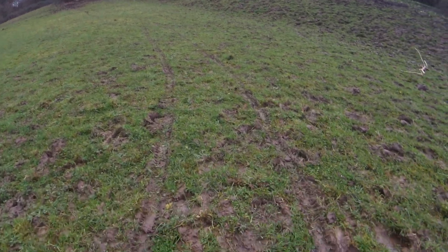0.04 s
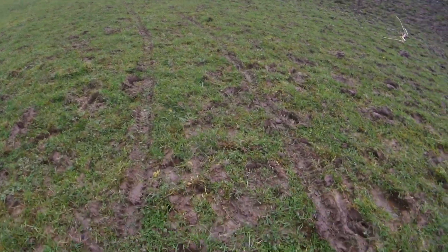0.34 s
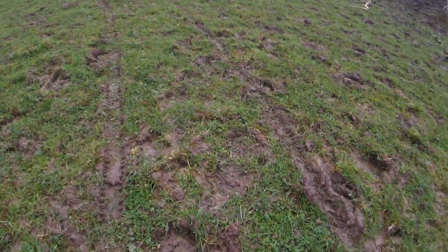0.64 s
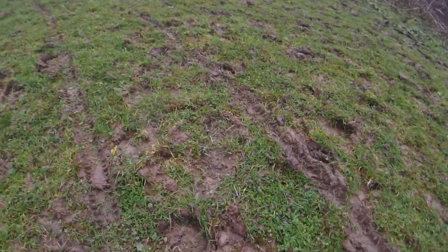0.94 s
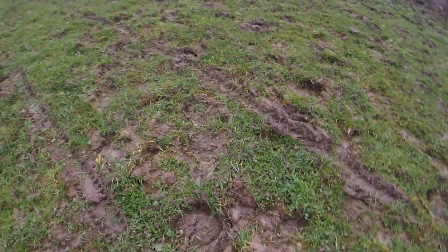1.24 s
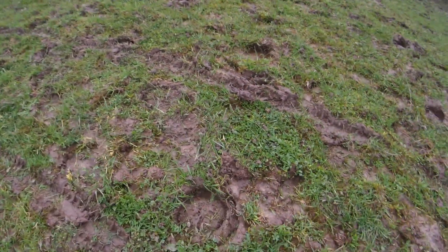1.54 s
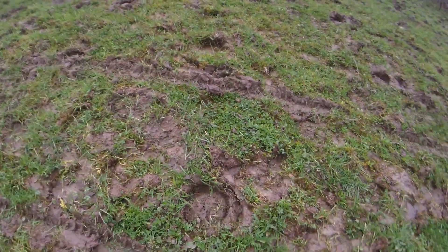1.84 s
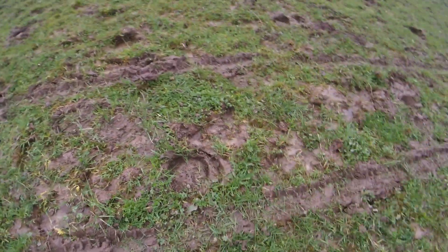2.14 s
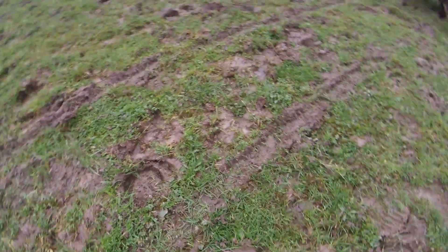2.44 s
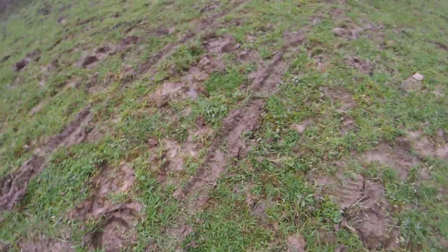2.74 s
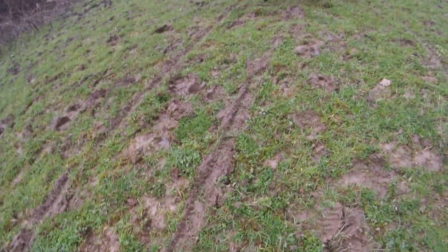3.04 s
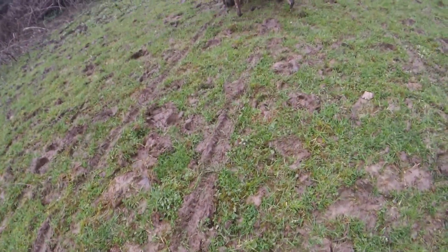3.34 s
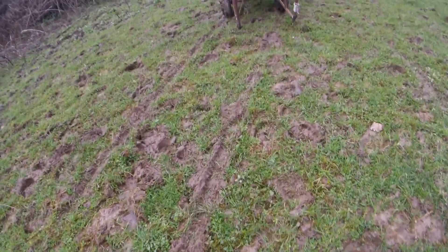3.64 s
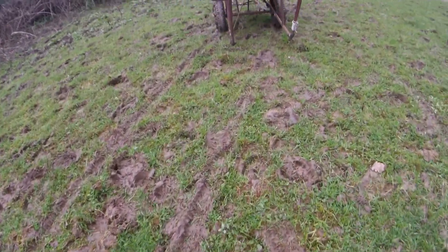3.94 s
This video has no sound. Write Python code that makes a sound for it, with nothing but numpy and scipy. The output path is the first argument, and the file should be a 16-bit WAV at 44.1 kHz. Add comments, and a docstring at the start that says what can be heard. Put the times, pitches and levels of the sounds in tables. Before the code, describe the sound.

Soft boot steps crackle through soggy turf as small birds whistle and wind starts rumbling.

```python
"""A wet, muddy pasture, heard from a camera microphone carried by a slow walker.
Close below, each boot presses the sod, makes the mud crackle with bursting bubbles and brushes the
grass; twice the mud squelches out from under the sole. Something ticks lightly. Small birds whistle
far off in quiet open air, and towards the end wind builds up, its eddies striking the microphone ports."""
import sys
import numpy as np
from scipy import signal
from scipy.fft import rfft, irfft
from scipy.io import wavfile
from scipy.ndimage import uniform_filter1d

SR = 44100
rng = np.random.default_rng(int(sys.argv[2]) if len(sys.argv) > 2 else 0)


def wrap_up_sound(samples):
    """Save the sound to the file named by the first command line argument, as 16-bit audio."""
    columns = np.atleast_2d(samples).T
    # keep every value between -1 and 1, then stretch to whole-number steps
    tamed = np.clip(columns, -1, 1)
    steps = np.round(tamed * 32767).astype(np.int16)
    wavfile.write(sys.argv[1], SR, steps)


N = 176400

# Levels are relative within each layer; the functions set the balance.
# footfalls and swings of a boot: t/s, hold/s, rise/s, fall/s, sod/dB, mud/dB, grass/dB
STEPS = [(0.0, 0.055, .02, 0.033, -67.5, -63.5, -77), (0.231, .06, 0.038, .015, -79, -66, -79),
         (0.319, 0.032, 0.014, .006, -62.5, -58.5, -65), (0.663, 0.032, 0.068, 0.041, -73, -66.5, -69),
         (0.774, 0.087, 0.043, 0.014, -93, -70.5, -75), (1.268, 0.059, 0.034, 0.023, -67, -67, -73.5),
         (1.341, 0.043, 0.019, 0.046, -58, -57, -65.5), (1.413, 0.063, .02, 0.072, -69.5, -62.5, -74),
         (1.944, 0.032, 0.0095, 0.024, -67, -60.5, -67), (2.007, .04, 0.01, .015, -78, -58.5, -69.5),
         (2.065, 0.016, 0.0068, 0.012, -59.5, -58, -71), (2.317, 0.11, 0.071, .03, -68.5, -75.5, -96),
         (2.434, 0.022, 0.0076, 0.029, -69, -61.5, -67.5), (2.485, 0.049, 0.0081, 0.072, -65, -59.5, -68.5),
         (2.59, 0.028, .02, 0.062, -72.5, -69, -81), (2.912, 0.04, .03, 0.035, -64.5, -60, -72.5),
         (2.996, 0.064, .02, .02, -72.5, -67.5, -75.5), (3.179, 0.09, .01, 0.052, -79, -79, -77.5),
         (3.44, 0.11, 0.055, .02, -69, -73, -85), (3.564, 0.16, .01, .035, -71, -66, -85.5)]
# mud squeezed from under the sole: t/s, hold/s, rise/s, fall/s, level/dB, cavity f/Hz, spray/dB
SQUELCHES = [(0.275, .011, 0.012, 0.0054, -52.5, 3200, -93),
             (0.297, 0.011, .003, 0.0033, -51.5, 3400, -63.5),
             (0.311, .024, 0.0043, .012, -47.5, 2570, -73), (0.339, 0.0068, .004, 0.004, -58, 2100, -67),
             (3.501, .008, 0.0055, 0.0036, -49.5, 2630, -77),
             (3.518, 0.0078, 0.0021, 0.0046, -46, 3370, -75)]
# single bubbles and stalks bursting: t/s, ring level/dB, f/Hz, snap level/dB
POPS = [(0.0651, -47.5, 3800, -49), (0.276, -36.5, 2980, -60), (0.28, -33.5, 3940, -66),
        (.3105, -32.5, 2170, -60), (0.3227, -29, 2360, -59), (.332, -34, 2320, -59),
        (0.3447, -43, 1680, -59), (0.366, -45, 3330, -53), (0.6821, -51, 3680, -44.5),
        (0.686, -60, 2950, -43), (.7866, -45, 3200, -53), (1.425, -38.5, 1870, -52),
        (1.431, -41, 3000, -61), (1.462, -43.5, 491, -70), (1.4687, -39, 3870, -63),
        (1.486, -39, 3870, -57), (1.6038, -46, 3240, -62), (1.6275, -46.5, 2670, -74),
        (1.943, -49, 3700, -53), (1.977, -37, 3670, -49), (2.07, -44, 1690, -62), (2.0784, -46, 4360, -62),
        (2.2231, -51, 3120, -50), (2.2242, -46.5, 7200, -60), (2.23, -55, 7300, -49),
        (2.378, -44, 2270, -68), (2.438, -43.5, 1930, -62), (2.502, -50, 1220, -45),
        (2.5474, -39.5, 3890, -61), (2.578, -47, 1700, -66), (2.627, -41.5, 4220, -62),
        (2.839, -48, 2220, -68), (2.9465, -38.5, 3200, -60), (3.0362, -42, 3920, -59),
        (3.5024, -45, 2680, -62), (3.5194, -48, 3240, -54), (3.559, -43.5, 1550, -68),
        (3.608, -46, 1950, -64), (3.836, -49, 1510, -63)]
# spectra of the sounds underfoot: f/Hz, level/dB
SOD_COLOUR = [(120, 2), (400, -0.5), (900, -1.5), (1500, 2), (2000, 3), (3000, -18.5), (6000, -22)]
MUD_COLOUR = [(600, -25.5), (1400, -11.5), (2200, -1), (3000, 2.5), (3900, 3), (4700, -6.5), (5600, -13.5),
              (9000, -27.5)]
GRASS_COLOUR = [(1500, -25), (4000, 6), (6000, 0), (8000, 1.5), (9200, -1.5), (11000, 1), (12500, -5.5),
                (15500, -20.5)]
SQUELCH_COLOUR = [(200, -6.5), (700, -5.5), (1300, 0), (2300, -3.5), (3500, 6), (4600, 0.5), (5400, -38.5),
                  (8000, -27.5)]
SNAP_COLOUR = [(1000, -34), (4000, -4), (7500, -11), (9000, -8), (11000, -4), (15500, -17)]

# wind rumble on the microphone: t/s, level/dB
GUSTS = [(0, -77), (.21, -62), (.27, -50.5), (.37, -48.5), (.47, -60), (.8, -62.5), (1.0, -69.5),
         (1.62, -73), (1.71, -50), (1.82, -79), (2.22, -60), (2.3, -51.5), (2.52, -57), (2.67, -37),
         (3.12, -41.5), (3.45, -34.5), (3.69, -34.5), (3.78, -24.5), (4, -26.5)]
# turbulence of the stronger gusts: t/s, left/dB, right/dB
BUFFETING = [(0, -101, -73), (2.55, -91, -75.5), (2.76, -64, -67), (2.88, -45.5, -54), (3.0, -43.5, -54),
             (3.15, -47.5, -70), (3.27, -45, -48), (3.5, -42.5, -45.5), (3.6, -54, -40), (3.69, -37, -36),
             (3.79, -29.5, -25.5), (4, -29, -20.5)]
# separate puffs striking the ports: t/s, hold/s, left/dB, right/dB
PUFFS = [(2.661, 0.013, -53, -46.5), (2.795, 0.025, -39, -50), (2.869, 0.012, -35, -43),
         (2.935, 0.062, -40, -42), (3.042, 0.015, -46, -41), (3.219, .08, -44.5, -41.5),
         (3.437, 0.02, -45, -32.5), (3.562, .075, -31.5, -31), (3.764, 0.021, -25, -23.5)]
# spectra of the wind at the ports: f/Hz, level/dB
RUMBLE_COLOUR = [(12, -20.5), (25, -1), (40, 1.5), (70, -4), (110, -18), (200, -34), (500, -75),
                 (4000, -110)]
TURBULENCE_COLOUR = [(15, -19), (30, -17.5), (70, 0.5), (115, 0.5), (170, -7), (250, -20.5), (350, -29),
                     (500, -43), (1000, -61), (3000, -79), (9000, -110)]

# small bright ticks: t/s, level/dB
TICKS = [(2.688, -62), (2.701, -54.5), (2.785, -64.5), (3.233, -53), (3.31, -59.5), (3.861, -61),
         (3.873, -49.5)]
# modes of the ticking object: f/Hz, level/dB, t60/s
TICK_MODES = [(6560, -13, .04), (11080, 3, 0.032), (11420, -4, 0.027)]
# bird notes: t/s, length/s, first f/Hz, middle f/Hz, last f/Hz, level/dB, warble/share of pitch
BIRD_NOTES = [(1.12, 0.049, 4600, 5300, 6000, -73.5, 0.059), (1.22, 0.056, 4900, 5680, 5100, -70.5, 0.063),
              (1.634, .11, 3500, 3790, 4200, -66.5, 0.034), (1.772, 0.03, 4550, 5100, 5340, -64.5, .008),
              (1.796, 0.037, 5270, 4800, 4400, -62, 0.011), (1.873, 0.043, 3900, 4240, 3990, -63.5, .06),
              (2.074, 0.046, 4470, 4560, 4500, -64.5, .005), (2.174, 0.032, 4860, 4950, 5000, -71, .008),
              (2.251, 0.022, 4580, 4570, 4440, -62.5, .005),
              (2.324, 0.048, 4550, 4550, 4540, -66.5, 0.0033),
              (2.42, 0.05, 3906, 3810, 3820, -55.5, 0.0055), (2.505, 0.037, 4250, 4255, 4250, -58, .006),
              (2.61, 0.055, 4310, 4390, 4520, -62, 0.01), (2.77, 0.044, 4480, 4530, 4430, -60.5, 0.0048),
              (2.922, .065, 4050, 4230, 4400, -59.5, 0.0073), (2.992, .04, 4680, 4620, 4500, -64, .008),
              (3.085, .06, 4100, 4180, 4370, -65.5, .02), (3.291, 0.034, 3790, 3990, 4145, -57, 0.011),
              (3.326, 0.033, 4330, 4650, 4600, -70, .02), (3.4, 0.075, 3500, 3915, 4080, -62.5, 0.0053),
              (3.339, 0.079, 9640, 8670, 7900, -82, .02), (3.628, 0.016, 5820, 4830, 4200, -72, .005),
              (3.646, 0.072, 4060, 4017, 3770, -59, 0.0074), (3.79, 0.1, 8200, 8600, 8500, -79.5, 0.013),
              (3.88, .085, 8000, 7600, 7400, -79, .008), (3.889, 0.016, 3360, 3440, 3150, -64, 0.0092),
              (3.911, 0.034, 3160, 3070, 3100, -61.5, .004)]
# loudness of song blurred by distance: t/s, level/dB
CHORUS_LEVEL = [(0, -75), (1.1, -87), (2.2, -77), (2.7, -71), (3.2, -69.5), (3.7, -77), (4, -83)]
# centre pitch of that song: t/s, f/Hz
CHORUS_PITCH = [(0, 3704), (1.5, 3900), (2.7, 4480), (3.2, 4080), (4, 3860)]
# faint low calls from farther off: t/s, hold/s, f/Hz, level/dB
FAR_CALLS = [(1.5, .4, 1270, -79), (2.12, .2, 1060, -78), (2.74, .12, 1300, -74)]
# spectrum of the open air: f/Hz, level/dB
AIR_COLOUR = [(25, -1), (70, -3), (170, -5.5), (300, -11.5), (500, -14), (1200, -17.5), (2200, -21.5),
              (3700, -17.5), (4500, -24.5), (5400, -33.5), (7500, -38.5), (11000, -35), (15500, -41.5)]
# treble hiss over the field: t/s, level/dB
HISS_LEVEL = [(0, -75), (.2, -82.5), (.5, -80), (.85, -83), (1.1, -86.5), (1.55, -76.5), (2.3, -79.5),
              (2.7, -80.5), (3.1, -96), (3.4, -87), (4, -95)]
# stereo width of the microphone: f/Hz, side gain/dB
MIC_WIDTH = [(100, 6.5), (400, -4.5), (1100, -4.5), (2600, -8), (4000, -13), (5200, 1.5), (6300, 7),
             (7500, 2), (9000, -1), (12000, -2.5), (15000, 0)]


def footsteps():
    """Just below the microphone, sod gives way, mud crackles in spurts and grass flicks the boot."""
    pressure = np.array([press(*step[:4]) for step in STEPS])
    layer_gains = undb(np.array(STEPS)[:, 4:]).T
    sod, mud, grass = np.sqrt(layer_gains ** 2 @ pressure ** 2)  # overlapping steps add in power
    spurts = undb(1.8 * wander(150))
    crackle = grains(per_s=2800, spread_db=3.5)
    return (colour(grains(per_s=1500, spread_db=3.5) * sod * spurts, SOD_COLOUR)
            + colour(crackle * mud * spurts, MUD_COLOUR)
            + bubbles(mud)
            + colour(grains(per_s=2500, spread_db=3) * grass * spurts, GRASS_COLOUR))


def bubbles(mud_level, count=1500, low_hz=886, high_hz=4620, decay_cycles=5.3, glide=0.14):
    """Small bubbles burst in the trodden mud, each a short ring that rises in pitch."""
    out, t = np.zeros((2, N)), np.arange(SR // 40) / SR
    for when, pitch, size, angle in rng.random((count, 4)):
        hz = low_hz * (high_hz / low_hz) ** np.sqrt(pitch)
        decay = np.exp(-t * hz / decay_cycles)
        ring = decay * tone(hz * (1 + glide * (1 - decay)))
        size_db = -3 + 3.5 * min(-np.log(1 - size), np.pi)  # many faint, a few loud
        direction = np.array([[1], [np.sqrt(2) * np.cos(2 * np.pi * angle)]])
        add(out, when * N / SR, mud_level[int(when * N)] * undb(size_db) * ring * direction)
    return out


def squelches(cavity_q=7.9):
    """A dense run of bursting bubbles rings the cavity under the sole and throws fine spray."""
    ring, body, spray = np.zeros((3, 2, N))
    bursts = grains(per_s=3500, spread_db=0.5)
    for start, hold, rise, fall, db, hz, spray_db in SQUELCHES:
        push = press(start, hold, rise, fall)
        cavity = signal.iirpeak(hz, cavity_q, fs=SR)
        ring += unit(signal.lfilter(*cavity, bursts)) * push * undb(db)
        body += bursts * push * undb(db)
        spray += bursts * push * undb(spray_db)
    return (undb(-2) * lowpass(ring, hz=5200, order=4)
            + undb(-5.5) * colour(body, SQUELCH_COLOUR) + colour(spray, GRASS_COLOUR))


def pops(ring_s=.0015, snap_s=.0012):
    """Single bubbles and stalks burst underfoot: a snap and a ring of a few cycles."""
    rings, snaps = np.zeros((2, 2, N))
    t = np.arange(SR // 40) / SR
    mid_side_phase = np.array([[0], [np.pi / 2]])
    for start, db, hz, snap_db in POPS:
        add(rings, start, undb(db) * np.sin(2 * np.pi * hz * t + mid_side_phase) * np.exp(-t / ring_s))
        add(snaps, start, undb(snap_db - 5) * rng.standard_normal((2, len(t))) * np.exp(-t / snap_s))
    return 0.64 * rings + colour(snaps, SNAP_COLOUR)


def wind(right_bias_db=3.5):
    """Wind right on the microphone: a low rumble, with puffs and buffeting that reach higher in pitch."""
    rumble = eddies(RUMBLE_COLOUR) * undb(curve(GUSTS) + right_bias_db * np.array([[-.5], [.5]]))
    buffeting = undb(wander(32) + np.array([curve(BUFFETING, column=1), curve(BUFFETING, column=2)]))
    puffs = sum(press(start, hold, rise=0.0063, fall=0.0085) * undb([[left], [right]])
                for start, hold, left, right in PUFFS)
    return undb(3) * rumble + undb(5) * eddies(TURBULENCE_COLOUR) * np.hypot(buffeting, puffs)


def eddies(spectrum, power_limit=.8):
    """Eddies hit each port separately: low noise with its largest swells evened out."""
    pressure = colour(noise(), spectrum)
    power = uniform_filter1d(pressure ** 2, SR // 25)
    return pressure / np.sqrt(1 + power / power_limit)


def ticks(attack_s=0.00082):
    """Light ticks with a thin, high ring, perhaps a small metal zip pull."""
    out, t = np.zeros((2, N)), np.arange(SR // 15) / SR
    attack = 1 - np.exp(-t / attack_s)
    for start, db in TICKS:
        for hz, mode_db, t60 in TICK_MODES:
            detuned_hz = hz * (1 + .006 * rng.standard_normal())
            ring = np.sin(2 * np.pi * (detuned_hz * t + rng.random((2, 1))))
            add(out, start, 0.59 * undb(db + mode_db) * ring * attack * undb(-60 * t / t60))
    return out


def birds(echo_t60_s=.5):
    """Small birds far off: gliding whistles that echo off the hedges."""
    song, waver = np.zeros(N), wander(160)
    for start, length, first, middle, last, db, warble in BIRD_NOTES:
        progress = np.linspace(0, 1, int(length * SR))
        glide_hz = np.polyval(np.polyfit([0, .5, 1], [first, middle, last], 2), progress)
        wobble = 1 + warble * np.roll(waver, -int(start * SR))[:len(progress)]
        swell = np.sqrt(2 * np.abs(np.sin(np.pi * progress)))
        add(song, start, undb(db) * swell * tone(glide_hz * wobble))
    t = np.arange(N) / SR
    tail = unit(noise() * undb(-60 * t / echo_t60_s)) / np.sqrt(N)
    echo = signal.fftconvolve(song[None], tail, axes=1)[:, :N]
    direction = np.array([[1], [.3]])  # left of centre
    return undb(-3) * song * direction + undb(-5) * echo


def far_chorus():
    """More distant song, blurred into a wavering band of noise."""
    blur = unit(lowpass(noise(), hz=260))
    band = unit(blur * tone(curve(CHORUS_PITCH) * (1 + 0.02 * wander(14))))
    return band * undb(curve(CHORUS_LEVEL) + 1.5 * wander(22))


def far_calls():
    """Narrow, wavering tones from farther off that barely rise above the air."""
    blur = unit(lowpass(noise(), hz=90))
    t = np.arange(N) / SR
    calls = sum(undb(db) * press(start, hold, rise=0.056, fall=0.036) * np.sin(2 * np.pi * hz * t)
                for start, hold, hz, db in FAR_CALLS)
    return np.sqrt(2) * blur * calls


def field():
    """Quiet open air all round, with a faint hiss and stray crackles from the wet turf."""
    air = colour(noise(), AIR_COLOUR) * undb(-65 + 1.2 * wander(2))
    hiss = colour(noise(), GRASS_COLOUR) * undb(curve(HISS_LEVEL))
    turf = undb(-80.5) * colour(grains(per_s=180, spread_db=3), MUD_COLOUR)
    return air + hiss + turf


def undb(db):
    """Decibels to gain."""
    return 10 ** (np.asarray(db) / 20)


def unit(x):
    """Scale to rms 1."""
    return x / np.sqrt(np.mean(x ** 2) + 1e-30)


def curve(rows, column=1):
    """A column of a table joined by straight lines in time."""
    rows = np.array(rows)
    return np.interp(np.arange(N) / SR, rows[:, 0], rows[:, column])


def gains(points):
    """Gain per frequency bin from points of f/Hz, level/dB."""
    hz, db = np.array(points, float).T
    bin_hz = np.arange(N // 2 + 1) * SR / N
    return undb(np.interp(np.log(bin_hz + 1), np.log(hz), db))


def colour(x, points):
    """Causal filter with the given spectrum; keeps the power of white noise."""
    cepstrum = irfft(np.log(unit(gains(points))), N)
    cepstrum[1:N // 2] *= 2  # fold to minimum phase
    cepstrum[N // 2 + 1:] = 0
    return irfft(rfft(x) * np.exp(rfft(cepstrum)), N)


def lowpass(x, hz, order=2):
    """Roll off above hz."""
    return signal.sosfilt(signal.butter(order, hz, fs=SR, output="sos"), x)


def tone(hz):
    """A sine that follows a moving pitch."""
    return np.sin(2 * np.pi * np.cumsum(hz) / SR)


def noise():
    """Two unrelated white noises."""
    return rng.standard_normal((2, N))


def wander(rate_hz):
    """Smooth random drift of rms 1."""
    span = max(int(SR / rate_hz), 1)
    drift = uniform_filter1d(rng.standard_normal(N), span, mode="wrap")
    return unit(uniform_filter1d(drift, span, mode="wrap"))


def grains(per_s, spread_db):
    """Random tiny clicks of uneven size, each from left or right, as mid and side."""
    hit = rng.random(N) < per_s / SR
    size = undb(spread_db * np.minimum(rng.exponential(size=N), 4))
    return unit(hit * size) * np.sign(noise())


def press(start, hold, rise, fall):
    """An envelope that swells up to start, holds and dies away; rise and fall are time constants."""
    t = np.arange(N) / SR - start
    exponent = np.minimum(t, 0) / rise - np.maximum(t - hold, 0) / fall
    return np.exp(np.maximum(exponent, -40))


def add(out, start, sound):
    """Mix a short sound in at a time."""
    i = max(int(start * SR), 0)
    out[..., i:i + sound.shape[-1]] += sound[..., :max(N - i, 0)]


def stereo(mid, side):
    """Mid and side to left and right; the two ports differ most in the bass and near 6 kHz."""
    side = irfft(rfft(side) * gains(MIC_WIDTH), N)
    return np.array([mid + side, mid - side])


def scene():
    """Boots close by, birds and field beyond, and wind directly on the ports."""
    close = footsteps() + squelches() + pops() + ticks()
    distant = birds() + far_chorus() + far_calls() + field()
    return stereo(*(close + distant)) + wind()


def record(dry):
    """The camera cuts the top steeply."""
    top_hz = 15750
    return signal.sosfilt(signal.ellip(10, .2, 70, top_hz, fs=SR, output="sos"), dry)


dry = scene()
out = record(dry)
wrap_up_sound(out)
```